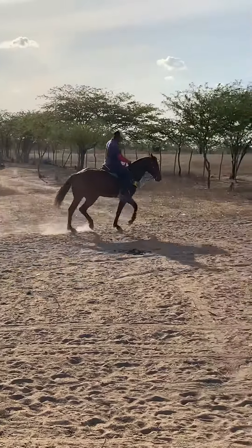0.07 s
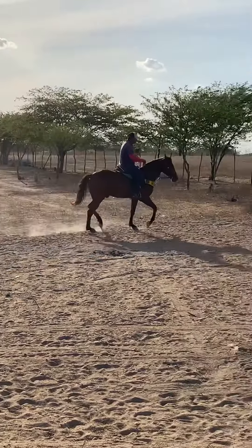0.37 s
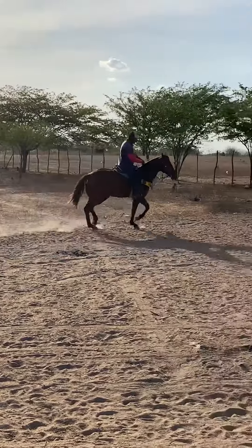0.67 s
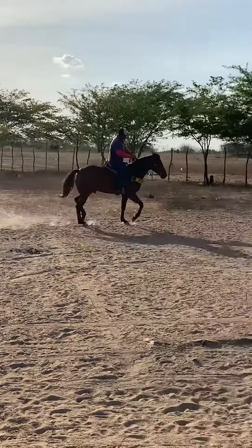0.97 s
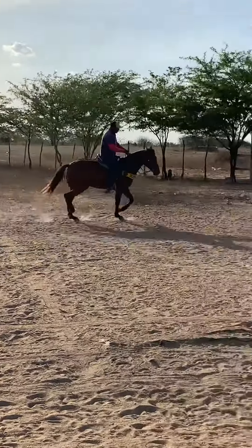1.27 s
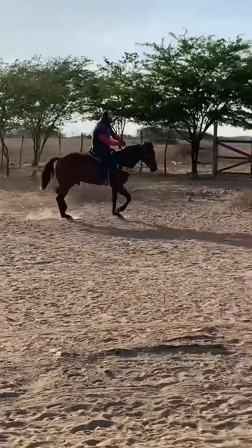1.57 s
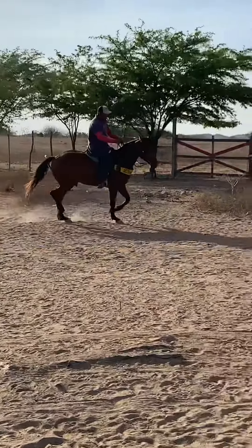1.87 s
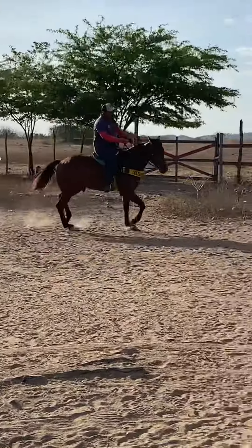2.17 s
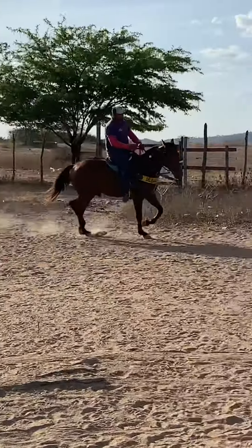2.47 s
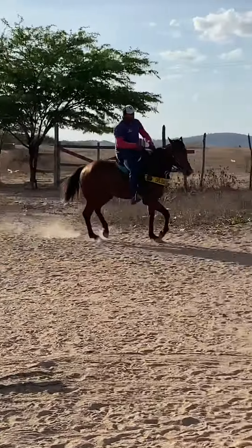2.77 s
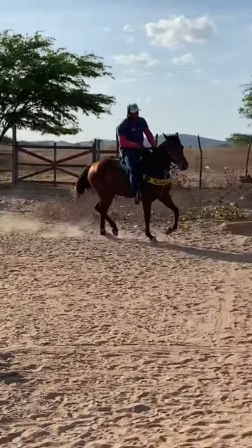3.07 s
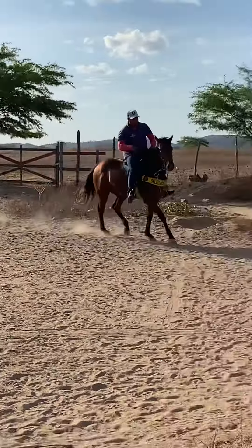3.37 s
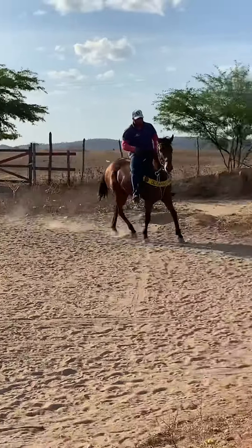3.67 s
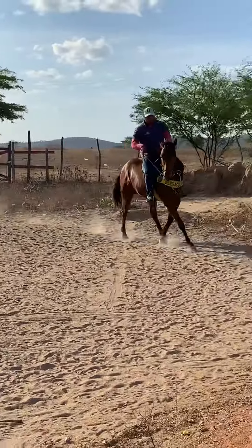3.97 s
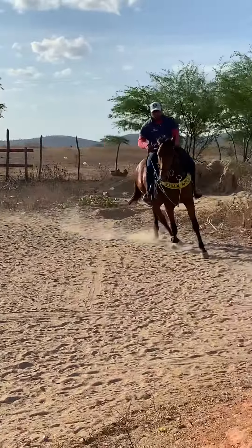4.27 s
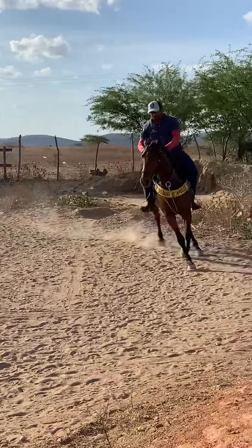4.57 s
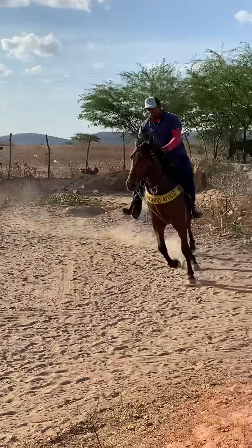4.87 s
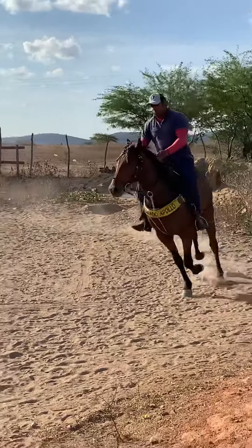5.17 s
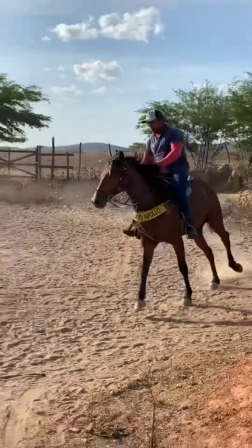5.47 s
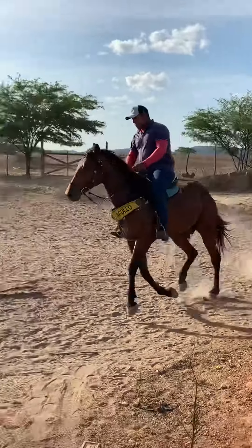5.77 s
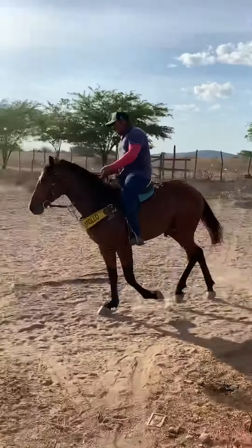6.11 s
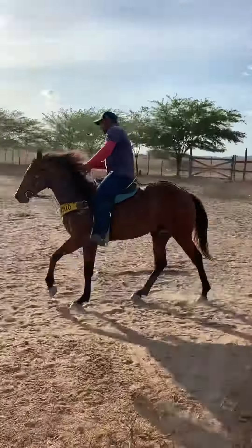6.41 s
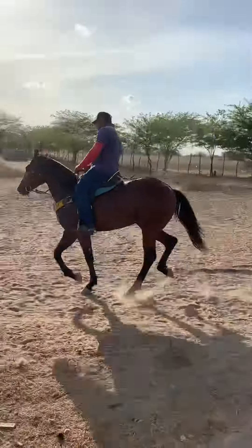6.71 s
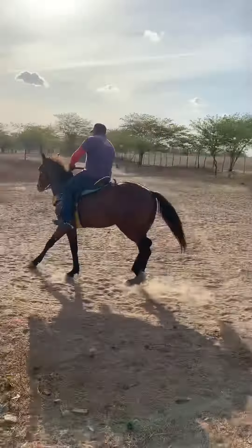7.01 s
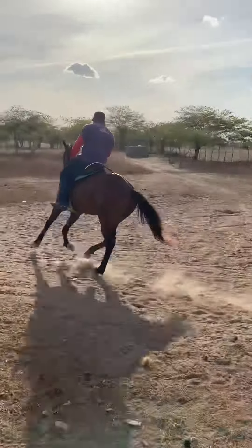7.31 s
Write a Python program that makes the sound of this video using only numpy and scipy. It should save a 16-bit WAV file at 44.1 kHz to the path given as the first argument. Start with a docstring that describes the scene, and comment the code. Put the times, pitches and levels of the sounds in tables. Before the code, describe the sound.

Uneven hoofbeats crunch on sand and draw nearer, with faint bridle jingles and gusts rumbling on the microphone.

```python
"""Horse cantering in a sand pen

Outdoors, a hand-held phone; the horse comes in from 14 m to about 5 m. Hooves knock, thud, crush grit
and throw sprays of sand, louder and brighter as it nears; the bridle ticks and jingles with the stride.
Gusts buffet the two microphone ports. Far off: a small bird and the faint noise of open country."""
import sys
import numpy as np
from scipy import signal
from scipy.fft import rfft, irfft
from scipy.io import wavfile
from scipy.ndimage import uniform_filter1d

SR = 44100
rng = np.random.default_rng(int(sys.argv[2]) if len(sys.argv) > 2 else 0)


def materialize(psi):
    """Save the field psi as 16-bit PCM at rate SR to the path in sys.argv[1].

    A 1-D psi becomes a single channel; in a 2-D psi each row is a channel.
    """
    bounded = np.clip(np.atleast_2d(psi).T, -1, 1)
    quanta = np.round(bounded * 32767).astype(np.int16)
    wavfile.write(sys.argv[1], SR, quanta)


N = 328491
TIME = np.arange(N) / SR
BINS = np.fft.rfftfreq(N, 1 / SR)


def undb(db):
    """Decibels to gain."""
    return 10 ** (np.asarray(db) / 20)


def unit(x):
    """Scale to rms 1."""
    return x / np.sqrt(np.mean(x ** 2))


def along(points, s=TIME):
    """Join (t/s, value) points in time."""
    return np.interp(s, *np.transpose(points))


def across(points):
    """Join (f/Hz, value) points on a log-frequency axis."""
    hz, value = np.transpose(points)
    return np.interp(np.log(BINS + 1), np.log(hz), value)


def colour(x, spectrum):
    """Filter by a spectrum."""
    return irfft(rfft(x) * undb(across(spectrum)), N)


def noise(spectrum):
    """Coloured noise of rms 1."""
    return unit(colour(rng.standard_normal(N), spectrum))


def band(x, lo_hz, hi_hz):
    """Gentle causal band-pass."""
    sos = signal.butter(2, [lo_hz, min(hi_hz, SR / 2 - 1)], "band", fs=SR, output="sos")
    return signal.sosfilt(sos, x)


def band_noise(t, lo_hz, hi_hz):
    """A band of noise of rms 1, as long as t."""
    return unit(band(rng.standard_normal(len(t)), lo_hz, hi_hz))


def walk(per_s):
    """Random drift with a spread near 1."""
    knots = np.arange(0, TIME[-1] + 1, 1 / per_s)
    return np.interp(TIME, knots, rng.standard_normal(len(knots)))


def fade(t, t60):
    """Exponential decay."""
    return np.exp(-np.log(1000) * t / t60)


def swell(x):
    """Rises to 1 at x = 1 and dies away."""
    return (x * np.exp(1 - x)) ** 2


def bell(s, length_s):
    """A smooth swell of power around a time."""
    return np.exp(-(2 * (TIME - s) / length_s) ** 2)


def add(track, s, sound):
    """Mix a sound in at a time."""
    start = int(np.clip(s * SR, 0, N - 1))
    track[start:start + len(sound)] += sound[:N - start]


# open country beyond the pen: f/Hz, level/dB
COUNTRY_SPECTRUM = [(100, -72), (300, -11), (520, 1.5), (680, -4), (850, 4.5), (1100, 2.5), (1550, 2),
                    (1850, -8), (2100, -8), (2800, -9), (3300, -21), (4300, -29), (6000, -23.5),
                    (10000, -29.5), (14000, -23), (16000, -36)]
# rise and fall of the far whine, and of the whole background: t/s, gain/dB
WHINE_GAIN = [(0, -6), (.55, 4.5), (.9, -0.5), (1.6, 0.5), (2.03, 3.5), (2.3, -8), (2.65, 4.5), (3.2, -7.5),
              (7.45, -3)]
COUNTRY_GAIN = [(0, 4), (.5, 4.5), (.78, 2.2), (1.2, .5), (1.5, 1.7), (1.8, 2.5), (2.3, 2), (4, 5.5),
                (7.45, 6)]


def country(country_db=-67, whine_hz=1078, whine_db=-75, common=0.59, swell_db=0.9, waver_db=5):
    """Faint far-off noise from all sides, with a rough, wavering whine in it."""
    left, right, shared = (noise(COUNTRY_SPECTRUM) for _ in range(3))
    around = (np.array([left, right]) + common * shared) / np.sqrt(2)
    # the midrange comes and goes with the air
    around += (undb(waver_db * walk(12)) - 1) * band(around, 400, 730)
    whine = band_noise(TIME, whine_hz - 20, whine_hz + 20) * undb(2.5 * walk(12))
    whine *= undb(whine_db + along(WHINE_GAIN))
    around *= undb(country_db + swell_db * walk(14))
    return undb(along(COUNTRY_GAIN)) * (around + whine)


# breeze at the microphone between gusts: t/s, level/dB
BREEZE_LEVEL = [(0.0, -47.5), (0.16, -53.5), (0.5, -41), (0.93, -54.5), (1.31, -51.5), (1.6, -46),
                (2.45, -51.5), (4.29, -56.5), (5.87, -44), (6.33, -53.5), (6.81, -40), (7.45, -44)]
# gusts: peak t/s, length/s, rumble level/dB, flutter over rumble/dB
WIND_GUSTS = [(0.206, 0.037, -34.5, -21.5), (0.41, 0.14, -43, -1), (0.536, 0.12, -35, -10),
              (0.77, 0.021, -33.5, -28), (0.955, 0.07, -39, -25), (1.21, 0.014, -37.5, -41),
              (1.492, 0.2, -35.5, -25), (1.671, 0.095, -33.5, -15), (1.89, 0.19, -38.5, -21),
              (2.26, 0.1, -41.5, -17), (2.767, 0.059, -38.5, -25), (2.873, 0.052, -38, -21),
              (4.412, 0.057, -51.5, -4), (4.552, 0.042, -45, -16), (4.78, 0.16, -48.5, -12.5),
              (5.132, 0.12, -43.5, -15), (5.329, 0.022, -41, -13.5), (5.76, 0.27, -42, -33),
              (6.014, 0.076, -34.5, -17.5), (6.277, 0.093, -39, -22), (6.54, 0.16, -41.5, -10.5),
              (6.81, 0.04, -38, -13.5), (6.928, 0.033, -32, -7.5), (7.154, 0.098, -36, -3),
              (7.399, 0.078, -35, -17)]


def wind_strength(breeze_db=3, breeze_flutter_db=-24, calm_flutter_db=-70):
    """Rumble and flutter in dB: bell-shaped gusts add their power to the breeze."""
    rumble = undb(breeze_db + along(BREEZE_LEVEL)) ** 2
    flutter = rumble * undb(breeze_flutter_db) ** 2 + undb(calm_flutter_db) ** 2
    for s, length, db, rough_db in WIND_GUSTS:
        gust = undb(db) ** 2 * bell(s, length)
        rumble += gust
        flutter += gust * undb(rough_db) ** 2
    return 10 * np.log10(rumble), 10 * np.log10(flutter)


def turbulence(spectrum, steady_s):
    """Air pressure that churns quickly while its strength stays even."""
    pressure = noise(spectrum)
    return pressure / np.sqrt(uniform_filter1d(pressure ** 2, int(steady_s * SR)))


# wind on the microphone, and how much of it differs between the ports: f/Hz, level/dB
RUMBLE_SPECTRUM = [(18, -11), (30, -18.5), (45, 3.5), (65, 5.5), (100, 0), (140, -8), (220, -22),
                   (400, -87)]
FLUTTER_SPECTRUM = [(70, -18.5), (130, 2.5), (180, 0.5), (260, -3.5), (380, -12.5), (600, -49.5),
                    (1200, -74)]
WIND_APART = [(30, -40.5), (70, -69), (150, -54), (300, -11.5)]
# single eddies slapping the microphone: peak t/s, level/dB, f/Hz
EDDY_SLAPS = [(0.211, -29, 105), (0.336, -35.5, 169), (.394, -24.5, 143), (.418, -25, 210),
              (.451, -27, 128), (0.46, -47, 214), (0.531, -25, 115), (0.562, -29.5, 97.5),
              (.578, -25, 84.6), (0.94, -31, 100), (1.42, -44, 288), (1.434, -29.5, 83),
              (1.503, -33.5, 145), (1.537, -26, 97), (1.55, -43, 346), (1.559, -28.5, 91),
              (1.618, -27.5, 90), (1.64, -38.5, 255), (1.65, -28, 225), (1.661, -43, 456),
              (1.667, -31, 118), (1.676, -37.5, 380), (1.82, -31, 89.5), (1.859, -39, 220),
              (2.037, -29, 78.5), (2.815, -31, 61.6), (4.041, -28.5, 94), (5.171, -34, 78.4),
              (5.378, -35.5, 149), (5.895, -27, 77.5), (6.024, -52, 62), (6.534, -28, 96),
              (6.612, -35.5, 207), (6.653, -31, 109), (6.669, -30, 113), (6.918, -29, 110),
              (6.957, -49, 148), (6.996, -30.5, 131), (7.105, -28.5, 118), (7.14, -30, 128),
              (7.168, -34.5, 207), (7.181, -32, 115)]


def wind(rumble_db=-2, flutter_db=0.5, puff_db=5, cycles=0.42, rise_s=0.0034, fall=0.79, apart_db=-15):
    """Gusts rumble and flutter on the microphone; each eddy is a swing or two of falling pitch."""
    rumble, flutter = wind_strength()
    puffs = puff_db * np.tanh(walk(55))
    shared = undb(rumble + rumble_db + puffs / 2) * turbulence(RUMBLE_SPECTRUM, steady_s=0.11)
    shared += undb(flutter + flutter_db + puffs) * turbulence(FLUTTER_SPECTRUM, steady_s=0.045)
    # the smaller whirls differ between the ports
    whirls = undb(flutter) * noise(FLUTTER_SPECTRUM) + undb(rumble) * noise(RUMBLE_SPECTRUM)
    apart = colour(whirls, WIND_APART)
    t = TIME[:SR // 5]
    for s, db, hz in EDDY_SLAPS:
        peak_s = rise_s + cycles / hz
        age = t / peak_s
        phase = 2 * np.pi * np.cumsum(hz * (1 + fall) / (1 + fall * age)) / SR
        size = undb(db) * swell(age)
        add(shared, s - peak_s, size * np.sin(phase))
        # an eddy reaches one port first, the more so the smaller it is
        add(apart, s - peak_s, undb(apart_db) * hz / 100 * size * np.cos(phase))
    return np.array([shared + apart, shared - apart])


HORSE_DISTANCE = [(0, 14.4), (2, 11.7), (4, 11.8), (5, 10.2), (6, 8.5), (7, 4.96), (7.45, 7.1)]


def metres(s):
    """How far off the horse is."""
    return along(HORSE_DISTANCE, s)


def pour(t, length_s, rise_s=0.0044):
    """Power of a stream of sand: it starts quickly, runs for a while and thins out."""
    return ((1 - np.exp(-t / rise_s)) / (1 + (t / length_s) ** 5)) ** 2


# flying sand: f/Hz, level/dB
SAND_SPECTRUM = [(150, 21.5), (370, 17.5), (500, 10.5), (770, 15), (1450, 10), (2000, 5.5), (3200, 5),
                 (3900, 5), (4400, -20), (5500, 4), (7500, -6.5), (8700, -3.5), (11800, -4), (13800, 0),
                 (15200, -15.5)]


def grains(hits_per_cycle=0.8, patchy_db=4, clump_db=2):
    """Grains collide in clumps, each size in its own half octave: few big clods, many fine grains."""
    spectrum = 0
    for octave in np.arange(7.5, 14.1, 0.5):
        weight = np.clip(1 - 2 * np.abs(np.log2(BINS + 1) - octave), 0, 1)
        chance = hits_per_cycle * 2 ** octave / SR
        hits = unit(rng.standard_normal(N) * (rng.random(N) < chance))
        spectrum += rfft(hits * undb(patchy_db * walk(120))) * np.sqrt(weight)
    stream = irfft(spectrum * undb(across(SAND_SPECTRUM)), N)
    return unit(stream * undb(clump_db * walk(200)))


def crackles(lo_hz, hi_hz, db_per_octave, per_s=200, spread_db=3.7, cycles=1.1):
    """Small stones and crumbs of crust click one by one, each at its own pitch."""
    out, t = np.zeros(N), TIME[:SR // 60]
    for when, pitch, chance in rng.random((int(per_s * TIME[-1]), 3)):
        hz = lo_hz * (hi_hz / lo_hz) ** pitch
        db = spread_db * min(-np.log(1 - chance), 3) + db_per_octave * np.log2(hz / lo_hz)
        click = swell(t * hz / cycles) * np.sin(2 * np.pi * hz * t)
        add(out, when * TIME[-1], undb(db) * click)
    return unit(out)


# sand scuffed or thrown by a hoof: t/s, length/s, level before distance loss/dB
SAND_SPRAYS = [(0, 0.044, 1.5), (0.192, 0.023, -1), (0.311, 0.042, 0), (0.61, 0.08, -1.5),
               (0.835, 0.029, -5), (0.922, 0.12, -4), (1.245, 0.067, -4), (1.465, 0.02, 2.5),
               (1.563, 0.051, -4.5), (1.724, 0.093, -8.5), (1.865, 0.079, -4), (2.111, 0.12, -1.5),
               (2.328, 0.11, -9.5), (2.468, 0.06, 1.5), (2.753, 0.046, 5), (3.023, 0.058, 4),
               (3.125, 0.21, -6.5), (3.298, 0.081, 2), (3.459, 0.032, 0.5), (3.576, 0.056, 5),
               (3.657, 0.12, -6), (3.818, 0.12, 3), (4.087, 0.076, 3), (4.338, 0.098, -1),
               (4.397, 0.044, 4), (4.523, 0.046, -2.5), (4.595, 0.12, 2), (4.92, 0.091, -4),
               (5.114, 0.14, -3), (5.173, 0.11, 5), (5.326, 0.11, -6.5), (5.446, 0.086, 0.5),
               (5.598, 0.058, 0), (5.67, 0.075, 3), (5.759, 0.11, 1.5), (5.832, 0.031, 1),
               (5.939, 0.1, 3.5), (6.054, 0.09, 0), (6.151, 0.09, 4.5), (6.299, 0.044, 3.5),
               (6.461, 0.079, 2), (6.583, 0.1, -5), (6.69, 0.04, -2.5), (6.789, 0.057, 1.5),
               (6.947, 0.071, -2.5), (7.102, 0.045, 2.5), (7.163, 0.082, 0), (7.279, 0.058, 6)]


def sand(sand_db=-37.5, treble_db=10.5, split_hz=4400, dull_db_per_m=1.32, shove_db=-6, toe_s=0.014):
    """Each scuff throws a stream of grains whose fine hiss dulls on the way to the microphone."""
    coarse_power, fine_power = np.zeros(N), np.zeros(N)
    t = TIME[:SR // 2]
    for s, length, db in SAND_SPRAYS:
        flow = (undb(db) / metres(s)) ** 2 * pour(t, length)
        add(coarse_power, s, flow)
        add(fine_power, s, flow * undb(-dull_db_per_m * metres(s)) ** 2)
    # a landing hoof shoves coarse sand, toe first
    for s, db, _ in HOOF_STRIKES:
        shove = undb(db / 2 + shove_db) / metres(s)
        add(coarse_power, s - toe_s, shove ** 2 * pour(t, length_s=0.069))
    stream = grains()
    low = irfft(rfft(stream) / (1 + (BINS / split_hz) ** 8), N)
    stones = undb(-5.5) * crackles(837, 3640, db_per_octave=-2.1)
    sparkle = undb(-11) * crackles(5400, 15200, db_per_octave=1.5)
    coarse = (low + stones) * np.sqrt(coarse_power)
    fine = (stream - low + sparkle) * np.sqrt(fine_power)
    return undb(sand_db) * (coarse + undb(treble_db) * fine)


def sinking(t, hz, cycles, fall):
    """A push into sand: it peaks at hz after the given cycles and drops in pitch as it dies."""
    age = t * hz / cycles
    return swell(age) * np.sin(2 * np.pi * np.cumsum(hz * (1 + fall) / (1 + fall * age)) / SR)


# hooves landing in the pen: t/s, level before distance loss/dB, knock f/Hz
HOOF_STRIKES = [(0.283, -3, 1077), (0.974, -6.5, 796), (1.116, -13, 1330), (1.482, -9.5, 900),
                (1.588, -3, 1400), (2.114, 1.5, 1240), (2.997, -4, 970), (3.171, -2.5, 1190),
                (3.588, -2, 935), (3.826, 4, 710), (3.834, -6, 797), (3.873, -1.5, 760), (4.123, 2, 810),
                (4.461, -1.5, 890), (4.599, -4, 960), (4.646, -0.5, 940), (4.666, 9.5, 700),
                (4.744, -4.5, 800), (4.884, 4, 1190), (4.921, -6, 800), (4.941, 1, 690), (4.949, 1.5, 796),
                (5.006, -4, 800), (5.121, -5, 860), (5.198, -0.5, 850), (5.218, 1, 830), (5.314, -5, 930),
                (5.383, -2, 885), (5.622, -4, 950), (5.629, -3.5, 1090), (5.977, -2, 1460),
                (6.075, 7, 1030), (6.437, -9.5, 740), (6.447, -7, 1180), (6.508, -3, 740), (6.594, -4, 870),
                (6.758, 0.5, 795), (7.022, -6.5, 705), (7.226, -5, 766), (7.347, -3, 950)]


def hooves(hoof_db=-24, knock_db=3.8, body_db=-18, crunch_db=-15, crack_db=-8, settle_db=-15.5):
    """A hoof knocks for a cycle or two; the crust cracks and crunches, the sand packs with a rasp."""
    out, t = np.zeros(N), TIME[:SR // 8]
    for s, db, hz in HOOF_STRIKES:
        size = undb(hoof_db + db) / metres(s)
        knock = undb(knock_db) * sinking(t, hz, cycles=1.2, fall=0.14)
        body = undb(body_db) * band_noise(t, 230, 520) * swell(t / 0.011)
        crunch = undb(crunch_db) * band_noise(t, 910, 2570) * fade(t, t60=0.055)
        crack = undb(crack_db) * band_noise(t, 1600, 2700) * fade(t, t60=0.0055)
        crust = (crunch + crack) * hz / 1000  # a harder, higher knock breaks more crust
        add(out, s, size * (knock + body + crust))
        # lumps give way under the sole, each with a small knock of its own
        for delay, ratio in rng.uniform((0.001, 0.5), (0.018, 2.4), size=(5, 2)):
            turns = t * hz * ratio
            add(out, s + delay, size * undb(settle_db) * swell(turns) * np.sin(2 * np.pi * turns))
    return out


# dry ticks of the bridle's buckles and links: t/s, level/dB, f/Hz
LINK_TICKS = [(0.2927, -53, 9500), (0.954, -48.5, 10400), (1.745, -56, 10900), (2.1545, -60, 10300),
              (2.35, -62, 14400), (2.4788, -56, 11100), (3.011, -49.5, 12300), (3.2363, -48, 15600),
              (3.47, -45, 15200), (3.905, -42.5, 15200), (4.117, -43, 12100), (4.27, -51, 13900),
              (4.337, -44.5, 11800), (4.5331, -41, 12700), (4.604, -49, 10000), (4.7508, -46, 14100),
              (4.971, -42, 14200), (5.172, -37, 15700), (5.6161, -50, 10800), (6.175, -42, 11900),
              (7.1284, -41, 9600)]


def bridle_links(tick_db=-4, t60=0.024, width=0.2, snap_db=-13, rebound_db=-10):
    """Tight links snap and fall back once."""
    out, t = np.zeros(N), TIME[:SR // 5]
    for s, db, hz in LINK_TICKS:
        for delay, touch_db in ((0, 0), (rng.uniform(0.0015, 0.013), rebound_db)):
            tick = band_noise(t, hz * (1 - width), hz * (1 + width))
            snap = undb(snap_db) * band_noise(t, 2500, 18000)
            add(out, s + delay, undb(db + touch_db + tick_db) * (tick + snap) * fade(t, t60))
    return out


def hiss(peak_s=0.51, length_s=0.24, hiss_db=-70, lo_hz=1300, hi_hz=3300):
    """A soft hiss swells with the first strong gusts."""
    air = unit(band(band_noise(TIME, lo_hz, hi_hz), lo_hz, hi_hz))
    return undb(hiss_db) * np.sqrt(bell(peak_s, length_s)) * air


# grit crushed under a hoof: peak t/s, length/s, level/dB, f/Hz
GRIT_CRUNCHES = [(0.983, 0.021, -63, 2460), (2.114, .004, -58, 2500), (3.032, 0.0056, -65, 3000),
                 (3.055, .012, -58, 2580), (3.147, 0.0048, -59.5, 2580), (3.175, .004, -73, 1600),
                 (3.203, 0.0031, -74, 3330), (3.236, 0.0043, -60, 3430), (3.609, 0.005, -59, 2500),
                 (3.828, 0.0069, -52.5, 1510), (3.873, .02, -52.5, 2770), (4.121, 0.0036, -52, 2550),
                 (4.603, 0.0038, -61, 3000), (4.644, .008, -53.5, 1530), (4.67, .006, -63, 1420),
                 (4.885, 0.004, -65, 1800), (4.936, 0.0059, -58.5, 3220), (5.196, 0.0095, -49, 2870),
                 (5.399, .004, -57.5, 2500), (5.616, .007, -68, 2300), (5.694, 0.011, -55, 2700),
                 (5.757, 0.0037, -48, 3200), (5.844, 0.017, -52, 2770), (5.955, 0.0075, -48, 2640),
                 (5.978, 0.014, -51, 3100), (6.013, .012, -57, 1080), (6.042, 0.0052, -54, 1500),
                 (6.075, .003, -45, 1800), (6.173, 0.01, -52, 3420), (6.21, 0.01, -54.5, 3100),
                 (6.262, 0.01, -58, 2900), (6.447, 0.0064, -53.5, 2870), (6.474, 0.0046, -48, 1700),
                 (6.485, 0.0085, -51, 1400), (6.535, 0.0052, -47, 6450), (6.685, 0.0075, -45, 3000),
                 (7.098, .005, -46, 2860), (7.128, .013, -47, 3180), (7.196, 0.011, -50.5, 6000),
                 (7.346, 0.0071, -41.5, 2750), (7.35, .005, -41.5, 1490)]


def grit(width=0.19, broad_db=-1, crack_chance=0.11, spread_db=3, rise_share=0.4):
    """Grit bears the weight for an instant and bursts: a short volley of cracks around one pitch."""
    out, t = np.zeros(N), TIME[:SR // 10]
    for s, length, db, hz in GRIT_CRUNCHES:
        peak_s = rise_share * length
        force = swell(t / peak_s)
        cracks = force * rng.standard_normal(len(t)) * (rng.random(len(t)) < crack_chance)
        cracks *= undb(spread_db * rng.exponential(size=len(t)))
        pitched = unit(band(cracks, hz * (1 - width), hz * (1 + width)))
        broad = undb(broad_db) * unit(band(cracks, 900, 8500))
        add(out, s - peak_s, undb(db) * unit(pitched + broad) * np.sqrt(np.mean(force ** 2)))
    return out


# a small bird far from the pen: t/s, top f/Hz, level/dB
BIRD_PEEPS = [(1.39, 4400, -76), (1.975, 4290, -73), (5.359, 5930, -65), (5.422, 5880, -65),
              (5.485, 5950, -68), (5.525, 5900, -72)]


def bird(length_s=0.031, arch=0.054):
    """Short, faint peeps that arch and waver in pitch."""
    out, progress = np.zeros(N), np.linspace(0, 1, int(length_s * SR))
    for s, hz, db in BIRD_PEEPS:
        waver = 0.025 * walk(500)[:len(progress)]
        pitch = hz * (1 - arch * (2 * progress - 1.15) ** 2 + waver)
        add(out, s, undb(db) * np.sin(np.pi * progress) * np.sin(2 * np.pi * np.cumsum(pitch) / SR))
    return out


# further modes of the bridle metal: f/Hz, level/dB, t60/s
METAL_MODES = [(5800, -28, 0.11), (11500, -32, 0.029), (13400, -4, 0.028)]
# jingles of the bit: t/s, level/dB
BIT_JINGLES = [(1.8159, -50), (3.208, -50), (3.686, -50), (3.7738, -43), (4.8227, -46.5), (5.755, -54)]


def bridle_bit(bit_hz=11400, bit_t60=0.039, jingle_db=-6, db_per_touch=-6, detune=0.02):
    """The loose bit touches three times, each weaker, and rings in close pairs of modes that beat."""
    out, t = np.zeros(N), TIME[:SR // 5]
    paired_modes = [(bit_hz, 0, bit_t60), *METAL_MODES] * 2
    for s, db in BIT_JINGLES:
        for touch, delay in enumerate([0, *np.sort(rng.uniform(0.005, 0.045, size=2))]):
            jingle = 0
            for hz, mode_db, t60 in paired_modes:
                pitch = hz * (1 + detune * rng.normal())
                jingle += undb(mode_db) * np.sin(2 * np.pi * pitch * t) * fade(t, t60)
            add(out, s + delay, undb(db + jingle_db + touch * db_per_touch) * jingle / 2)
    return out


# the horse's weight coming down on firm ground: peak t/s, level/dB, f/Hz
GROUND_THUDS = [(2.869, -48, 227), (3.005, -49, 450), (3.371, -44, 260), (3.601, -41.5, 220),
                (3.838, -41.5, 474), (3.877, -38.5, 240), (4.677, -40, 330), (4.788, -43.5, 187),
                (4.931, -46, 424), (4.951, -40.5, 315), (5.224, -39.5, 432), (6.083, -43, 327),
                (6.322, -37, 307), (6.455, -33.5, 315), (6.544, -33.5, 167), (6.564, -41, 220),
                (6.649, -46, 215), (7.029, -47, 450), (7.145, -40, 291), (7.231, -40, 300),
                (7.413, -36, 245)]


def thuds(thud_db=-1, rasp_db=-16):
    """The ground gives one short, dull swing under the weight, roughened by shifting sand."""
    out, t = np.zeros(N), TIME[:SR // 12]
    for s, db, hz in GROUND_THUDS:
        peak_s = 1 / hz
        swing = sinking(t, hz, cycles=1, fall=0.35)
        rasp = undb(rasp_db) * band_noise(t, hz / 2, hz * 2) * swell(t / peak_s)
        add(out, s - peak_s, undb(db + thud_db) * (swing + rasp))
    return out


# the left microphone port's lead over the right: f/Hz, phase/rad
LEFT_LEAD = [(100, 0), (400, 0), (600, -.85), (1000, -.7), (1700, -.1), (2000, .9), (3000, .7), (4500, 3.1),
             (6600, 6.1), (7500, 6.7), (8700, 9.3), (9600, 9.9), (11100, 12.5), (13100, 15.6),
             (15200, 18.8)]
# left port minus right: f/Hz, level/dB
LEFT_BALANCE = [(350, 0), (650, -7), (1100, -2), (1600, -3), (2400, 0), (3000, -6), (3700, 0), (8000, 0)]


def ports(x, scatter_db=-7, scatter_t60=0.037):
    """Sound reaches the two ports at different times and levels, with a little ground scatter."""
    sides = np.array([[0.5], [-0.5]])
    response = undb(sides * across(LEFT_BALANCE)) * np.exp(1j * sides * across(LEFT_LEAD))
    direct = irfft(rfft(x) * response, N)
    t = TIME[:SR // 3]
    tail = band(rng.standard_normal((2, len(t))), 600, 13000) * fade(t, scatter_t60)
    tail /= np.sqrt(np.sum(tail ** 2, axis=1, keepdims=True))
    return direct + undb(scatter_db) * signal.fftconvolve(x[None], tail, axes=1)[:, :N]


def scene():
    """Country all around, wind right on the microphone, the horse in its pen and a far bird."""
    background = country() + wind()
    horse = sand() + hooves() + bridle_links() + grit() + bridle_bit() + thuds()
    return background + ports(horse + hiss() + bird())


def record(dry, top_hz=15900):
    """The phone cuts the top of the band."""
    return signal.sosfilt(signal.ellip(10, 0.2, 80, top_hz, fs=SR, output="sos"), dry)


dry = scene()
out = record(dry)
materialize(out)
```